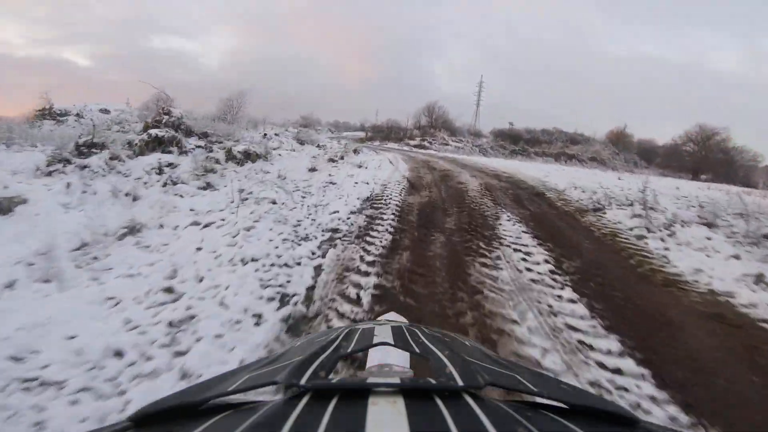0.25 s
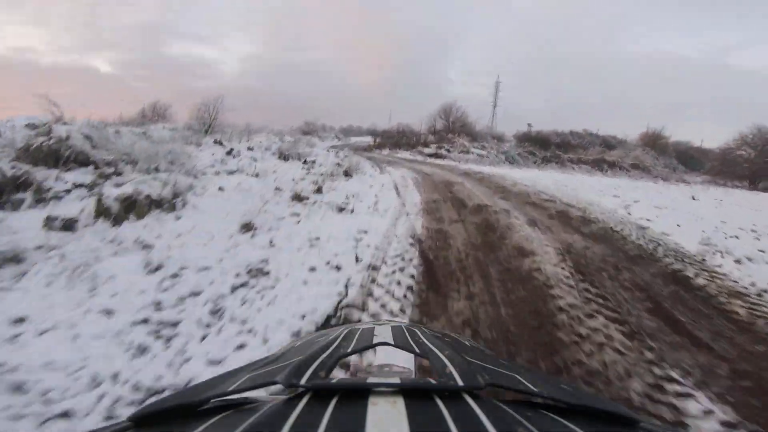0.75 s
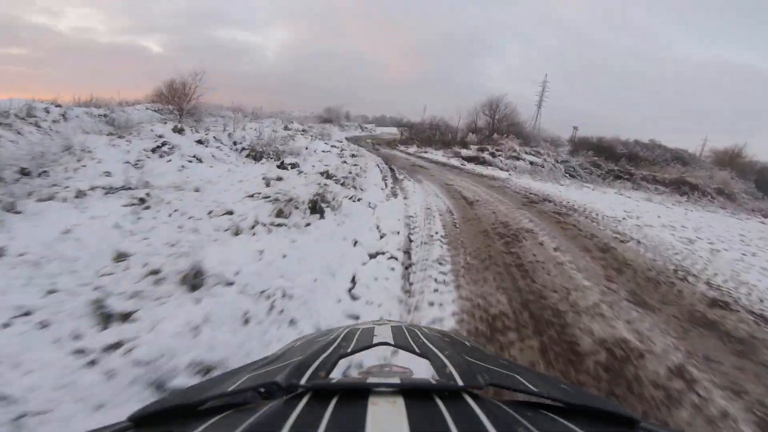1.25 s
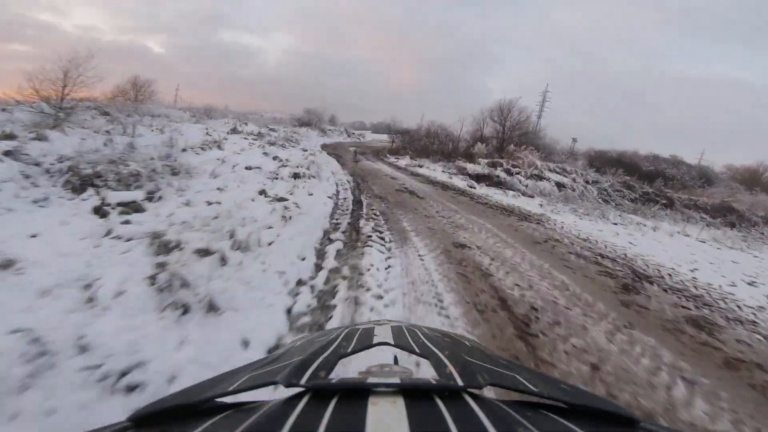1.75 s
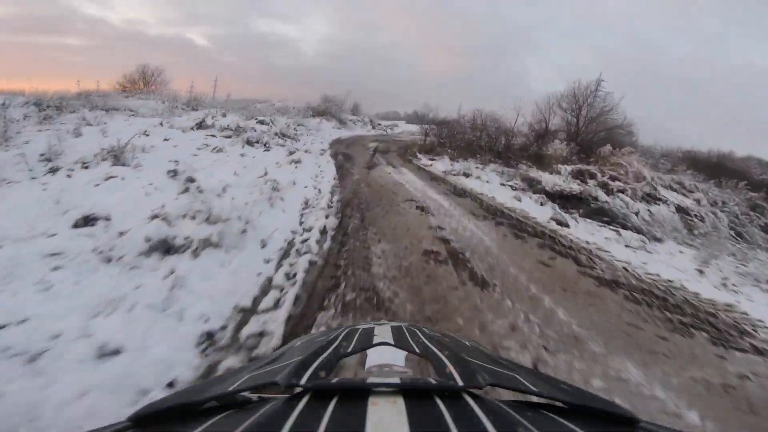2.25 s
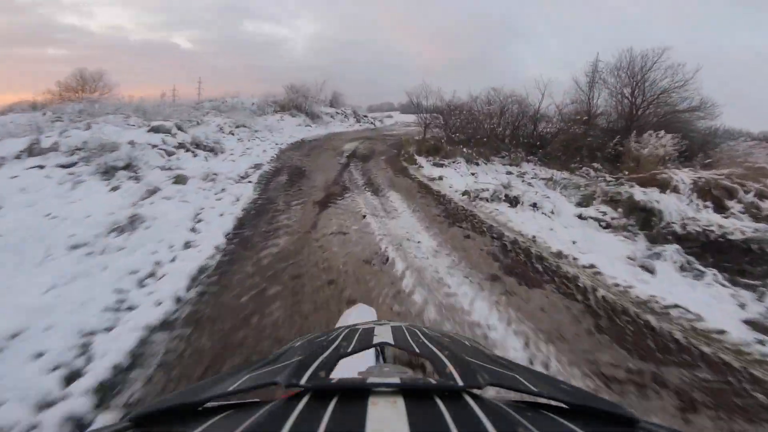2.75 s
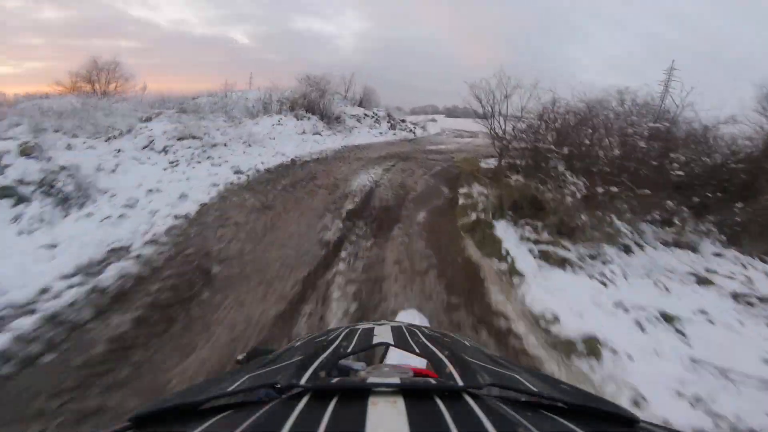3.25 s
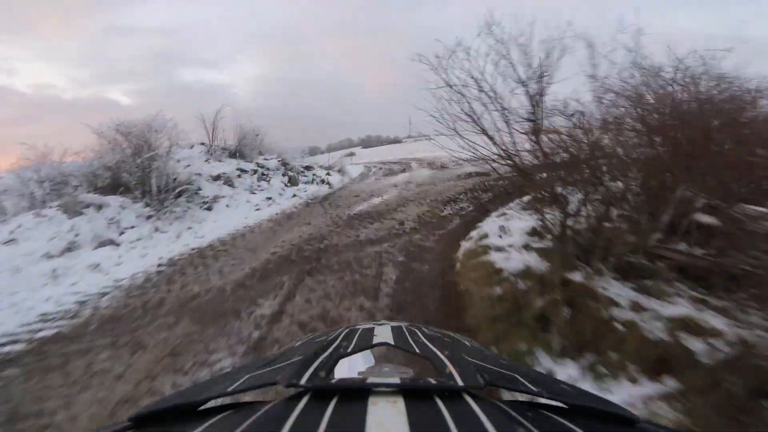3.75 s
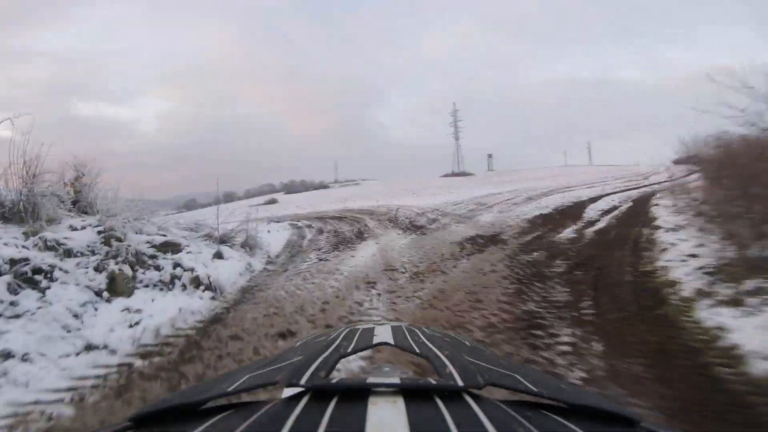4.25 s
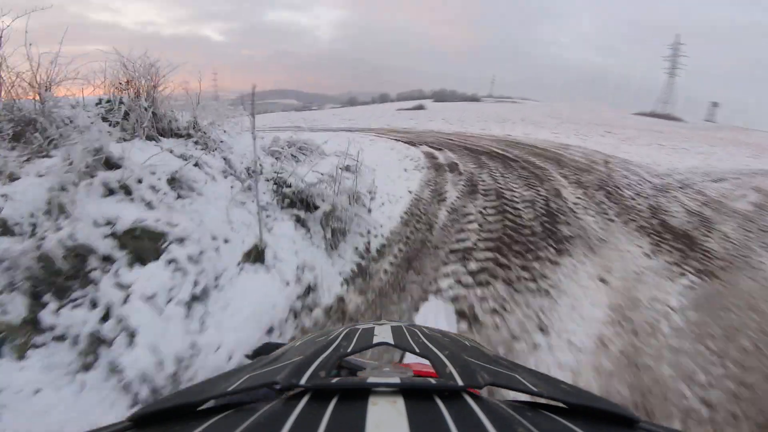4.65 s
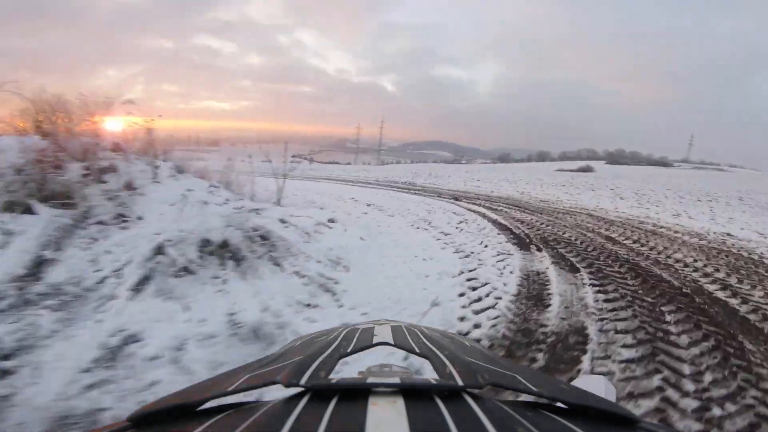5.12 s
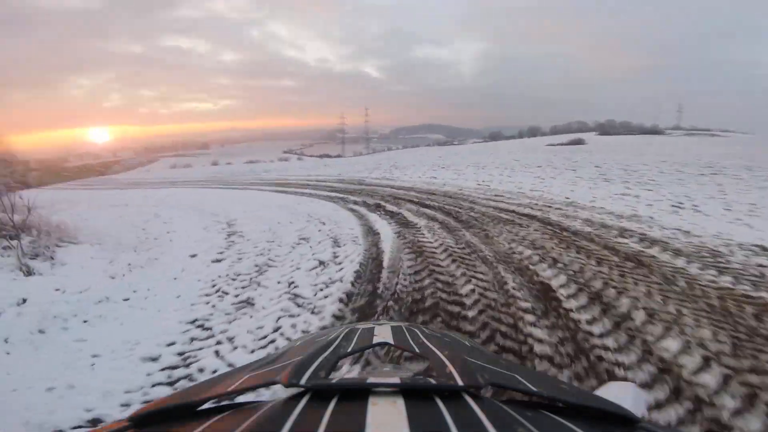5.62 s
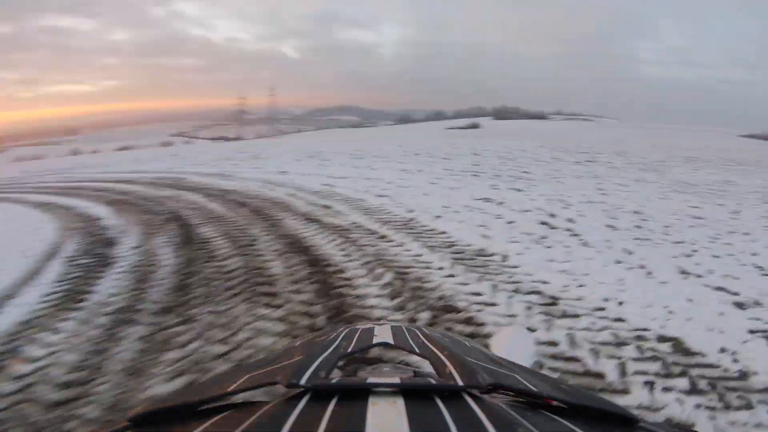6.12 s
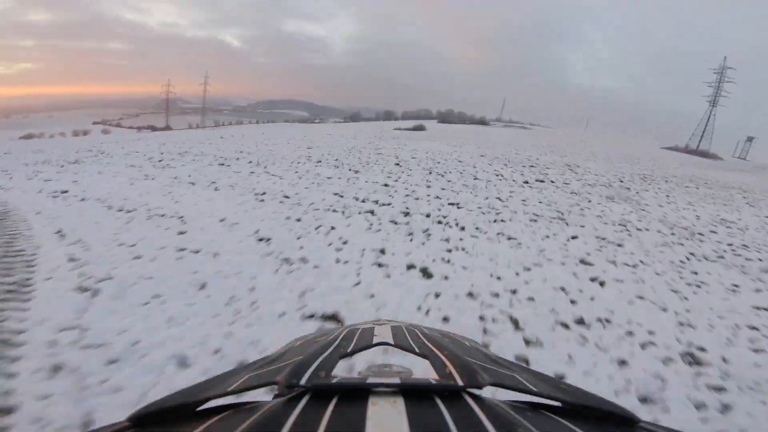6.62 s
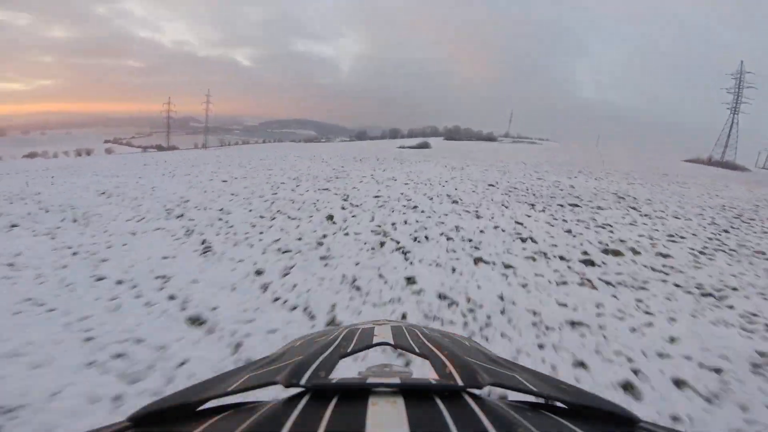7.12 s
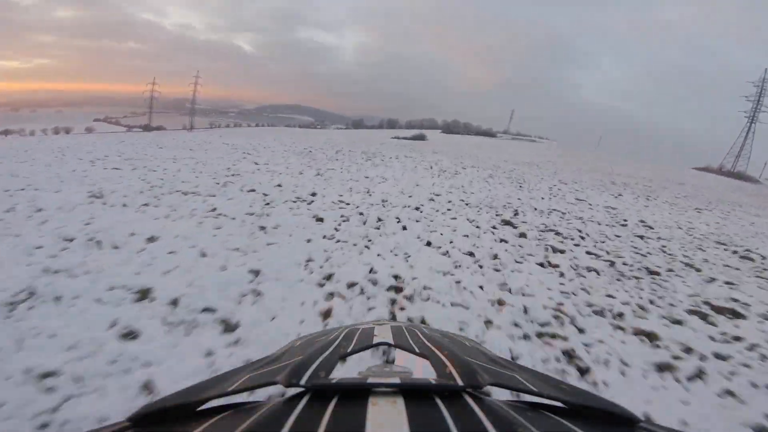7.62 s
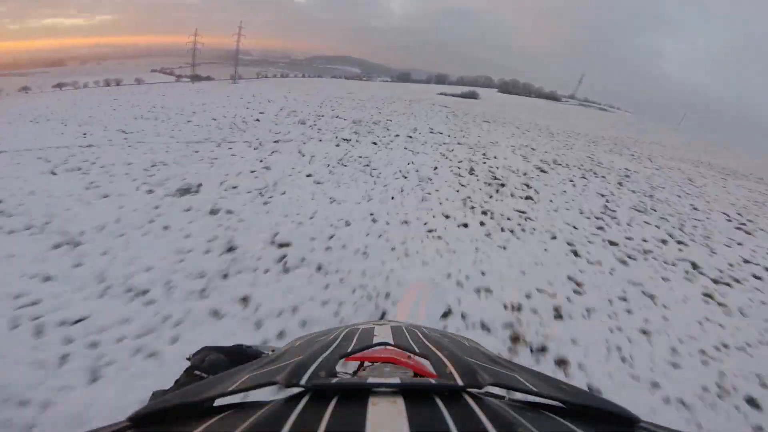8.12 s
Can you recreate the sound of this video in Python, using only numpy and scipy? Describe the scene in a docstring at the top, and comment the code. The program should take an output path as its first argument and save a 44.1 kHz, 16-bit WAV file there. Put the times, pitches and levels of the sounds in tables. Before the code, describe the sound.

A two-stroke dirt bike runs throughout, heard close from the rider's helmet, with a buzzing exhaust, thin metallic clatter, tyre and chain noise and low wind rumble. The engine revs up twice between about 0.4 and 1.3 seconds, then falls back into uneven exhaust pops. Short throttle bursts follow at 2, 2.6, 3.5 and 3.8 seconds, with sputtering between them. Dull thumps from bumps come around 0.9 to 1.5 seconds and now and then from 3.4 to 5.7. From 3.9 to 5.8 seconds the bike coasts at low revs, popping irregularly while the tyres scrape through ruts. Stones tick briefly against the frame near 3.4 and 5 seconds. At 5.8 seconds the engine pulls into a longer, raspy climb, peaking near 7.1. It eases for a moment, then rises again from 7.5 seconds until the end at about 8.4.

```python
"""Two-stroke trail bike, frozen track.

A single cylinder, heard from a boxed microphone on the rider's helmet. Every crank turn sends a pulse
down the exhaust pipe; off throttle only some turns fire, and those pop. The intake rasps, the casing
clatters and rings, wind buffets, tyres and chain roar, bumps thump the helmet, stones knock the frame."""
import sys
import numpy as np
from scipy import signal
from scipy.io import wavfile
from scipy.ndimage import uniform_filter1d

SR = 44100
rng = np.random.default_rng(int(sys.argv[2]) if len(sys.argv) > 2 else 0)


def int16_out(signal):
    """Quantize to a 16-bit WAV file."""
    q = np.round(np.clip(np.atleast_2d(signal).T, -1, 1) * 32767)
    wavfile.write(sys.argv[1], SR, q.astype(np.int16))


N = 369116
TIME_S = np.arange(N) / SR


def gain_of(db):
    """Decibels to amplitude."""
    return 10 ** (np.asarray(db) / 20)


def unit_rms(x):
    """Scale to rms 1."""
    return x / np.sqrt(np.mean(x ** 2) + 1e-20)


def curves(rows):
    """Columns of a time table, interpolated per sample."""
    times_s, *columns = np.transpose(rows)
    return [np.interp(TIME_S, times_s, column) for column in columns]


def noise(spectrum, size, patchy_db, flicker_db):
    """Shaped noise, rms 1, with drifting spectral patches and broadband flicker."""
    frames, hz = 4 * N // size + 5, np.fft.rfftfreq(size, 1 / SR)
    real, imag, patches = rng.standard_normal((frames, len(hz), 3)).T
    patches = unit_rms(uniform_filter1d(uniform_filter1d(patches, size=6, axis=0), size=6, axis=1))
    flicker = unit_rms(uniform_filter1d(rng.standard_normal(frames), size=3))
    knots_hz, knots_db = np.transpose(spectrum)
    colour_db = np.interp(np.log(hz + 1), np.log(knots_hz), knots_db, right=-90)
    spectra = (real + 1j * imag) * gain_of(colour_db[:, None] + patchy_db * patches + flicker_db * flicker)
    return unit_rms(signal.istft(spectra, nperseg=size, noverlap=3 * size // 4)[1][:N])


def resonate(x, hz, width_hz):
    """Two unity-gain resonators in series: shift to 0 Hz, smooth, shift back."""
    carrier = np.exp(2j * np.pi * np.cumsum(hz * np.ones(len(x))) / SR)
    pole = np.exp(-np.pi * width_hz / SR)
    for _ in range(2):
        x = 2 * (carrier * signal.lfilter([1 - pole], [1, -pole], x * carrier.conj())).real
    return x


# Open throttle, one list per pull: (time [s], crank speed [Hz], load [dB])
PULLS = [
    [(0.0, 92.5, -7), (0.11, 91.94, -10.5), (0.2, 94.8, -12)],
    [(0.37, 66.3, -1), (0.498, 72, 0.5), (0.592, 86.96, -3.5), (0.7, 95.16, -2), (0.782, 116.7, -1.5),
     (0.84, 119.3, -12)],
    [(0.87, 85.32, -9), (1.008, 82.6, -4), (1.11, 91.8, -3.5), (1.242, 119.8, 0), (1.29, 118.4, -15)],
    [(1.985, 68.67, -1), (2.063, 73.54, -1), (2.165, 86.55, -3)],
    [(2.575, 70.96, 3.5), (2.657, 78.74, 0.5), (2.781, 97.96, 0), (2.889, 117.1, -3), (2.92, 114.7, -8)],
    [(3.48, 76.14, 5.5), (3.55, 83.18, -4.5)],
    [(3.77, 83.5, 0), (3.884, 88.1, -5), (3.9, 84.5, -1)],
    [(5.845, 61.67, -5), (5.975, 62.35, -4), (6.047, 71.84, -0.5), (6.099, 70.2, -0.5), (6.151, 81.34, -1),
     (6.275, 96.06, -1.5), (6.495, 89.47, -1), (6.641, 101.1, 1.5), (6.691, 107, 0), (7.023, 109.4, 0.5),
     (7.083, 128.4, -4), (7.125, 122.5, -2.5), (7.19, 118.4, -10)],
    [(7.51, 75.2, -9.5), (7.6, 78.55, -3.5), (7.72, 83.5, 1), (7.83, 93.5, -3), (7.912, 94.7, -2.5),
     (7.984, 108, -3.5), (8.046, 111, 0), (8.136, 114.9, -1.5), (8.224, 113, 0), (8.37, 123.5, -2)],
]


def throttle():
    """Throttle-open mask and engine load in dB."""
    is_open = sum((TIME_S >= rows[0][0]) & (TIME_S <= rows[-1][0]) for rows in PULLS) > 0
    return is_open, curves(np.concatenate(PULLS))[1]


# Eased throttle, one list per stretch: (time [s], crank speed [Hz], exhaust level [dB])
COASTING = [
    [(0.22, 88.3, -18.5), (0.328, 88, -19), (0.35, 70.1, -17.5)],
    [(1.31, 111.3, -32), (1.558, 79.9, -34.5), (1.794, 65.8, -23), (1.97, 65.6, -20)],
    [(2.18, 79.1, -17.5), (2.342, 66.2, -33.5), (2.56, 69.64, -20.5)],
    [(2.94, 110.5, -51), (3.164, 76.1, -20.5), (3.4, 69, -34), (3.46, 71, -15)],
    [(3.57, 72.1, -48), (3.692, 72.7, -25.5), (3.75, 76.7, -21)],
    [(3.92, 84, -31.5), (4.35, 57.5, -31.5), (4.558, 53.4, -26.5), (4.738, 60.6, -35), (5.2, 56.5, -34.5),
     (5.558, 54.6, -20.5), (5.67, 64.1, -21.5), (5.83, 64, -18)],
    [(7.21, 113.5, -31), (7.36, 105.1, -33.5), (7.49, 79.3, -22)],
]


def crank():
    """Crank speed and turn count, nudged while coasting so pops fall on whole turns."""
    crank_hz = curves(sorted(row[:2] for rows in PULLS + COASTING for row in rows))[0]
    turns = np.cumsum(crank_hz) / SR
    eased = ~throttle()[0]
    pop_at = np.flatnonzero(pop_clicks() * eased)
    coasted = np.cumsum(eased)
    nudge = np.interp(coasted, coasted[pop_at], np.round(turns[pop_at]) - turns[pop_at])
    return crank_hz, turns + nudge


# Full load: (crank speed [Hz], exhaust [dB], boom [dB], bite [dB/oct], clatter [dB], roar [dB], rasp [dB])
ENGINE_MAP = [(60.6, -7, -24.5, -2.5, -44, -36.5, -4), (72.5, -29.5, -15, 9, -43.5, -38, -7.5),
              (86.9, -11, -19, 3.5, -41, -35.5, -5), (93.1, -8.5, -24, -1, -34.5, -34, -1.5),
              (103, -13, -31, 2.5, -36, -31, -0.5), (108, -13.5, -29, 8.5, -32.5, -30.5, -10.5),
              (113.6, -14, -30, 1.5, -30, -33.5, -6.5)]


def by_speed(crank_hz):
    """Engine map columns at the current speed."""
    speeds_hz, *columns = np.transpose(ENGINE_MAP)
    return [np.interp(crank_hz, speeds_hz, column) for column in columns]


# Offsets per pull: (boom [dB], clatter [dB])
PULL_TRIMS = [(-14, 5), (4, 4), (9, 2.5), (2, 5), (3, 5), (-5.5, 4), (-7, 5), (4.5, 2), (11, 2.5)]


def pull_trims_db():
    """Boom and clatter offsets, held through each pull."""
    return curves([(rows[end][0], *trim) for rows, trim in zip(PULLS, PULL_TRIMS) for end in (0, -1)])


# Exhaust pipe modes: (nominal frequency [Hz], nominal width [Hz], gain [dB])
PIPE_MODES = [(237.4, 105.3, 13.5), (463.5, 118, 0.5), (605.5, 50, -3), (824, 35, -22), (1033, 38, -30.5),
              (1260, 340, -36.5)]


def pipe(x, bite_db, damping, tuning=1):
    """Pipe resonances; sharp pulses lift the upper ones by bite_db per octave."""
    corner_hz, out = 264.5, 0
    for k, (hz, width_hz, db) in enumerate(PIPE_MODES):
        drive = x * gain_of(bite_db * max(np.log2(hz / corner_hz), 0))
        out += (-1) ** k * gain_of(db) * resonate(drive, hz * tuning, width_hz * damping)
    return out


def exhaust(turns, crank_hz):
    """One pulse per turn drives pipe and silencer boom; unfired turns pump air softly and unevenly."""
    is_open, load_db = throttle()
    full_db, boom_db, bite_db = by_speed(crank_hz)[:3]
    eased_db = curves(np.concatenate(COASTING))[1]
    spread_db = np.where(is_open, 0.7, 2.5)
    scatter = rng.standard_normal(int(turns[-1]) + 2)[turns.clip(0).astype(int)]
    ticks = np.diff(np.floor(turns), prepend=0).clip(0, 1)
    pulses = ticks * gain_of(spread_db * scatter) * np.sqrt(SR / crank_hz)  # rms near 1
    click = signal.unit_impulse(8000)

    body_db = np.where(is_open, full_db + load_db, eased_db)
    bite_db = np.where(is_open, bite_db, -21)
    warming = (crank_hz / 85) ** 0.035  # hotter gas at speed carries sound faster
    body = pipe(pulses * gain_of(body_db), bite_db, damping=0.81, tuning=warming)
    body /= np.linalg.norm(pipe(click, 0, damping=1))

    base_hz, width_hz = 264.5, 35
    boom_db = np.where(is_open, boom_db + load_db + pull_trims_db()[0], eased_db - 9.5)
    boom = resonate(pulses * gain_of(boom_db), base_hz * (crank_hz / 72) ** 0.34, width_hz)
    return body + boom / np.linalg.norm(resonate(click, base_hz, width_hz))


def silencer_packing(x, corner_hz=411, advance_s=0.001068):
    """All-pass delay: the packing holds bass back, so treble leaves first."""
    pole = np.exp(-2 * np.pi * corner_hz / SR)
    dispersed = signal.sosfilt([[-pole, 1, 0, 1, -pole, 0]] * 4, x)
    return np.roll(dispersed, -round(advance_s * SR))


# Intake harmonics: (crank multiple, relative level [dB])
RASP_HARMONICS = [(6, -41.5), (7, -35.5), (8, -37), (9, -49.5), (10, -47), (11, -48), (12, -40),
                  (13, -51.5), (14, -43.5)]


def intake_rasp(turns, level_db, waver_db=3.6):
    """Wavering crank harmonics while the throttle is open."""
    is_open, load_db = throttle()
    envelope = uniform_filter1d(is_open * gain_of(load_db + level_db), size=600)
    wavers = unit_rms(uniform_filter1d(rng.standard_normal((len(RASP_HARMONICS), 400)), size=3))
    position, out = np.linspace(0, 399, N), 0
    for (multiple, db), waver in zip(RASP_HARMONICS, wavers):
        rms = gain_of(db + waver_db * np.interp(position, np.arange(400), waver))
        out += rms * np.sqrt(2) * np.cos(2 * np.pi * multiple * turns)
    return envelope * out


# Throttle closing, per coasting stretch: (clatter change [dB], time constant [s])
SHUTS = [(-6, 0.039), (-5.5, 0.082), (-1.5, .05), (-1.5, 0.017), (-0.5, 0.024), (0.5, .1), (-12.5, 0.013)]


def clatter_shift_db(load_share=0.26, reopen_s=0.13):
    """Clatter follows load, mostly sinking as the throttle shuts and returning as it opens."""
    is_open, load_db = throttle()
    shift_db = pull_trims_db()[1] * is_open + load_share * uniform_filter1d(load_db * is_open, size=1500)
    for rows, (db, shut_s) in zip(COASTING, SHUTS):
        onset = 1 - np.exp(-(TIME_S - rows[0][0]).clip(0) / shut_s)
        release = np.exp(-(TIME_S - rows[-1][0]).clip(0) / reopen_s)
        shift_db += db * onset * release
    return shift_db


# Casing clatter through the box: (frequency [Hz], relative density [dB])
CLATTER_SPECTRUM = [(2500, -14), (3500, -20.5), (4330, -22), (5000, -13), (5600, -6.5), (6050, -19),
                    (6900, -15.5), (8000, -18), (9500, -22.5), (11000, -40.5)]
# Casing modes: (frequency [Hz], nominal width [Hz], relative gain [dB])
CASING_MODES = [(5180, 120, -9), (5620, 50, -9), (5820, 60, -5), (6400, 170, -1), (7780, 150, -15.5)]


def casing(turns, crank_hz, level_db):
    """Rattle swelling once a turn, plus modes struck by noise and a knock a turn, stronger at speed."""
    swell = unit_rms(3 + np.exp(-((turns + 0.27) % 1) / 0.2))
    impacts = unit_rms(np.diff(np.floor(turns + 0.6), prepend=0) * rng.uniform(0.7, 1.3, N))
    strike = swell * rng.standard_normal(N) + 0.7 * impacts
    rings = sum(gain_of(db) * resonate(strike, hz, 1.24 * width) for hz, width, db in CASING_MODES)
    rings_db = -5.5 + 0.098 * (crank_hz - 83)
    rattle = swell * noise(CLATTER_SPECTRUM, size=512, patchy_db=1.5, flicker_db=1)
    clatter = unit_rms(rattle + gain_of(rings_db) * unit_rms(rings))
    return clatter * pop_shake(level_db, burst_db=-29, fall_s=0.025)


# Wind noise: (frequency [Hz], relative density [dB])
WIND_SPECTRUM = [(14, -8), (28, 3.5), (60, 1), (110, 1), (200, -3.5), (400, -12.5), (800, -25.5)]
# Gusts: (time [s], level [dB])
GUSTS = [(0.0, -29.5), (1.6, -24.5), (2.3, -23.5), (2.87, -28), (3.4, -28), (3.5, -22), (4.2, -24),
         (4.62, -22), (4.8, -28), (5.5, -25.5), (6.1, -30.5), (6.9, -26), (7.15, -33.5), (7.6, -24.5),
         (8.37, -29)]


def wind():
    """Gusts buffet the microphone with a low rumble."""
    return gain_of(curves(GUSTS)[0]) * noise(WIND_SPECTRUM, size=2048, patchy_db=1.2, flicker_db=0.5)


# Tyre and chain noise: (frequency [Hz], relative density [dB])
ROAR_SPECTRUM = [(200, 3), (500, 8), (1000, 1.5), (1400, 2.5), (2000, -3.5), (2500, -4.5), (3200, -10.5),
                 (4200, -16.5), (7000, -7)]
# Ruts: (start [s], length [s], level [dB])
SCRAPES = [(0.0, .22, -49), (3.923, 0.21, -34), (4.47, 0.17, -30.5), (4.998, 0.16, -38), (5.164, .14, -32)]


def tyres_and_chain(level_db):
    """Rolling roar; swells as tyres scrape through ruts and pops shake the frame."""
    scrapes = sum(gain_of(db) * np.sin(np.pi * ((TIME_S - start_s) / length_s).clip(0, 1)) ** 0.5
                  for start_s, length_s, db in SCRAPES)
    envelope = np.hypot(pop_shake(level_db, burst_db=-29.5, fall_s=0.021), scrapes)
    return envelope * noise(ROAR_SPECTRUM, size=512, patchy_db=2, flicker_db=1.03)


# Lone strong firings: (time [s], level [dB])
POPS = [(0.046, -17), (0.086, -17), (0.129, -9.5), (0.231, -12.5), (0.273, -6), (0.322, -14), (0.334, -13),
        (0.364, -10), (0.9, -7), (0.938, -10.5), (1.507, -19), (1.657, -19), (1.718, -9.5), (1.779, -12),
        (1.822, -13.5), (1.882, -11), (1.936, -13), (1.981, -11.5), (2.188, -15), (2.199, -13), (2.257, -7),
        (2.316, -22), (2.33, -11), (2.476, -11), (2.539, -9.5), (2.565, -16), (3.181, -11.5), (3.195, -13),
        (3.22, -11.5), (3.237, -12), (3.259, -14.5), (3.443, -10.5), (3.469, -17), (3.729, -9),
        (3.759, -13), (4.075, -17), (4.192, -15), (4.251, -5.5), (4.321, -5.5), (4.403, -8.5), (4.505, -8),
        (4.594, -7.5), (4.674, -19.5), (4.768, -17), (5.078, -29), (5.179, -15), (5.363, -7.5), (5.436, -9),
        (5.491, -10.5), (5.507, -14), (5.556, -9), (5.628, -10), (5.683, -8.5), (5.716, -9.5), (5.748, -10),
        (5.789, -12), (5.803, -30), (5.839, -21), (7.493, -17), (7.533, -18)]


def pop_clicks():
    """One impulse per lone firing."""
    times_s, level_db = np.transpose(POPS)
    clicks = np.zeros(N)
    clicks[np.round(times_s * SR).astype(int)] = gain_of(level_db)
    return clicks


def pop_shake(level_db, burst_db, fall_s, rise_s=0.0045, lead_s=0.0055):
    """Envelope with a burst per pop; the firing shakes the bike before the pop leaves the pipe."""
    t = np.arange(4000) / SR
    burst = np.minimum(t / rise_s, 1) * np.exp(-(t / fall_s) ** 4)
    bursts = np.roll(signal.oaconvolve(pop_clicks(), burst)[:N], -round(lead_s * SR))
    return np.hypot(gain_of(level_db), gain_of(burst_db) * bursts)


def pops(echo_s=0.00437, echo_db=-9):
    """Each sharp firing rings the pipe, runs back up it and comes out again."""
    click = signal.unit_impulse(8000)
    echo = gain_of(echo_db) * np.roll(click, round(echo_s * SR))
    pop = pipe(click + echo, bite_db=5, damping=1.09)
    return signal.oaconvolve(pop_clicks(), pop / abs(pop).max())[:N]


def knocks(table, decay_cycles):
    """Damped sines with a soft onset."""
    out, t = np.zeros(N + 4000), np.arange(4000) / SR
    for start_s, db, hz in table:
        age = t * hz / decay_cycles
        envelope = gain_of(db) * age * np.exp(1 - age)
        out[round(start_s * SR):][:len(t)] += envelope * np.sin(2 * np.pi * hz * t)
    return out[:N]


# Track bumps: (time [s], envelope peak [dB], pitch [Hz])
BUMPS = [(0.889, -18, 56.5), (1.097, -17.5, 86.1), (1.228, -19, 40.4), (1.367, -14, 56.5),
         (1.503, -15, 61.9), (3.433, -16.5, 73), (3.596, -10.5, 111), (4.318, -14.5, 75.4),
         (4.717, -18, 42.7), (5.134, -20.5, 93.5), (5.489, -18, 56.5), (5.726, -23, 108)]


def bumps():
    """The bike hits bumps and the helmet thumps."""
    return knocks(BUMPS, decay_cycles=0.66)


# Stone hits: (time [s], envelope peak [dB], pitch [Hz])
STONES = [(3.403, -18.5, 5500), (3.42, -32, 1760), (5.02, -23, 1210), (5.079, -34, 1303)]


def stones():
    """Flung stones ring the frame briefly."""
    return knocks(STONES, decay_cycles=2.7)


def scene():
    """All sources, close to one microphone."""
    crank_hz, turns = crank()
    clatter_db, roar_db, rasp_db = by_speed(crank_hz)[3:]
    shift_db = clatter_shift_db()
    ride = wind() + tyres_and_chain(roar_db + 0.4 * shift_db) + bumps() + stones()
    tailpipe = silencer_packing(exhaust(turns, crank_hz) + pops())
    engine = tailpipe + intake_rasp(turns, rasp_db) + casing(turns, crank_hz, clatter_db + shift_db)
    return (engine + ride)[None]


def record(dry):
    """Soft clip, then low-pass."""
    ceiling, cutoff_hz = 0.74, 10300
    rounded = ceiling * np.tanh(dry / ceiling)
    lowpass = signal.firwin(255, cutoff_hz, window=("kaiser", 5), fs=SR)
    return signal.oaconvolve(rounded, lowpass[None], "same")


dry = scene()
out = record(dry)
int16_out(out)
```